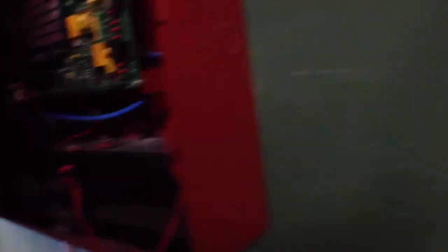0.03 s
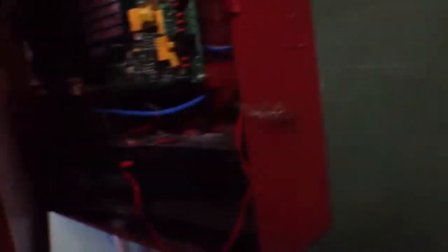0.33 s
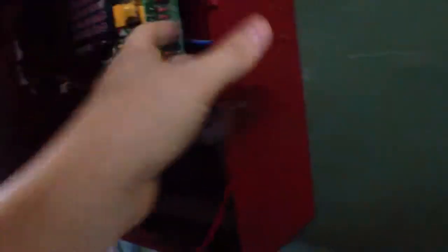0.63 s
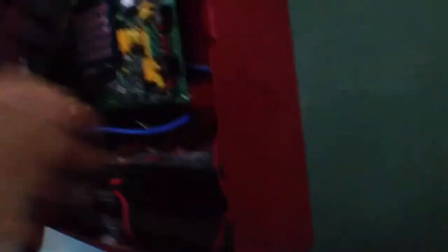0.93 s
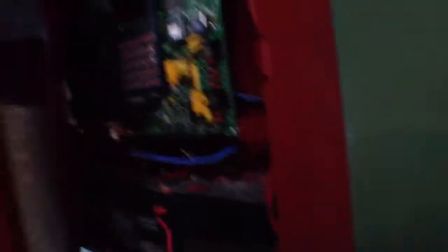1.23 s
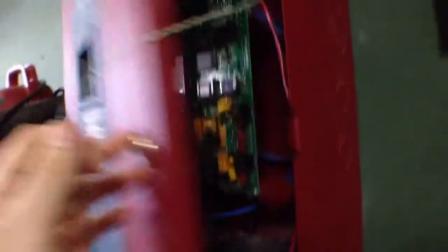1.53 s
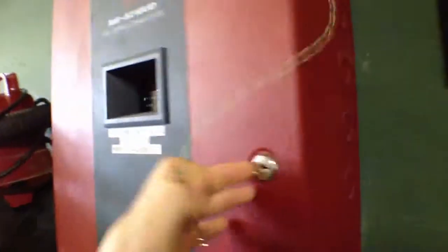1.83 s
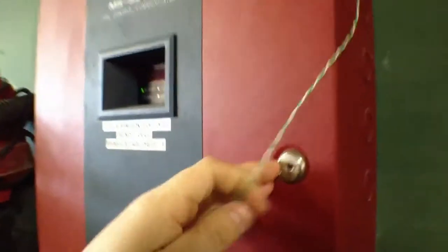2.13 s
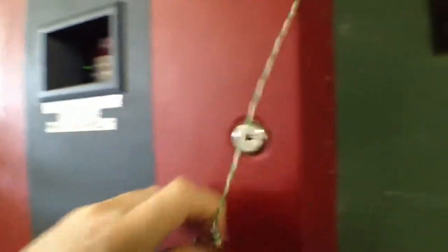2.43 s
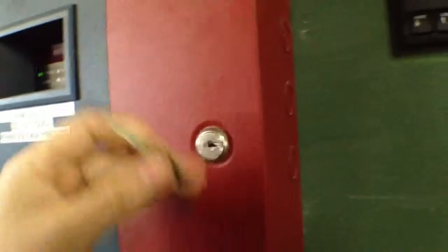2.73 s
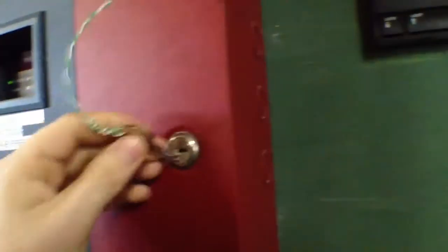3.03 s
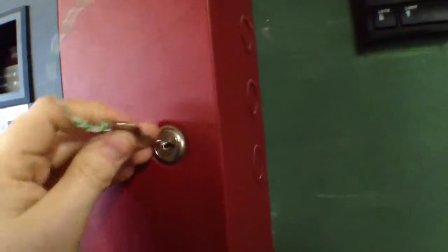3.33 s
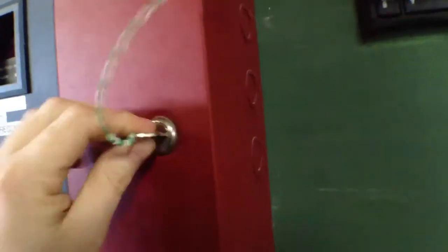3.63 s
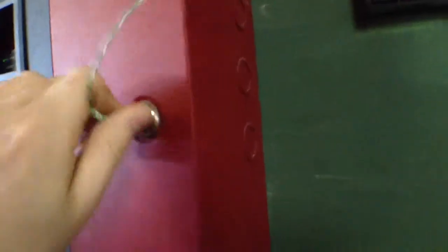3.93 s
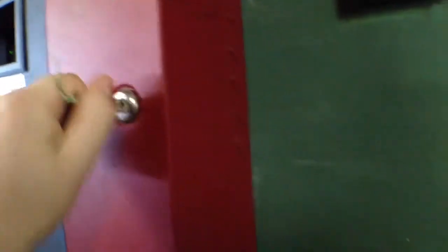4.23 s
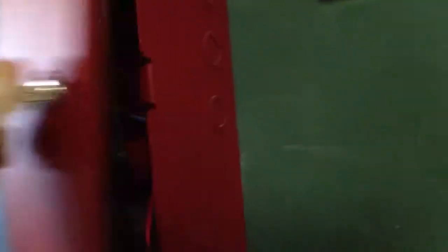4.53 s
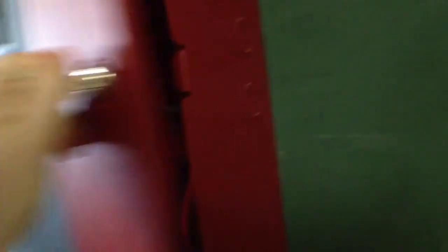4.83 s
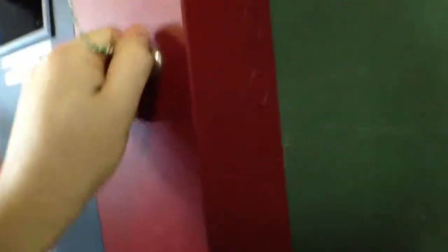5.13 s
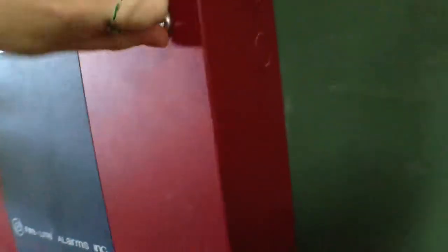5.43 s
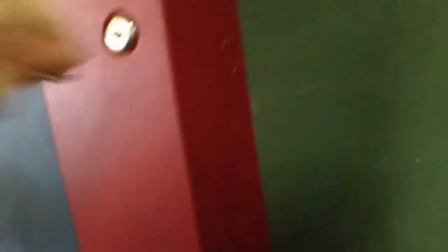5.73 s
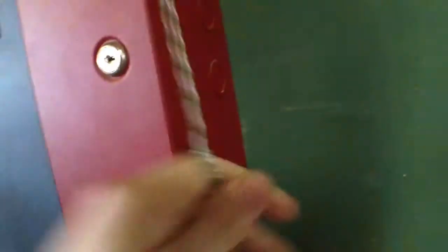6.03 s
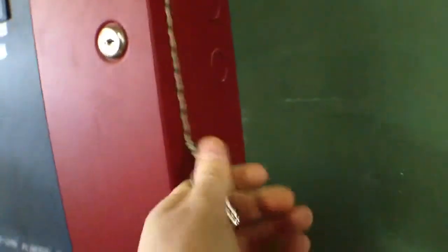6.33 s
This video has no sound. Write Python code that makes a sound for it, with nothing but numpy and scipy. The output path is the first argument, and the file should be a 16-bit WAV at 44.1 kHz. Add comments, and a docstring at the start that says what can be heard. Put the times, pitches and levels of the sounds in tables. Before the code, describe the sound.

A key knocks about, a metal cabinet door swings shut, and the lock clicks and squeaks before the door bangs closed again.

```python
"""A garage with bare walls, up close to a sheet-steel wall cabinet. A key on a cord knocks about in the
open box and the door swings shut. The key slides in and turns with small squeaks, the door is pulled
ajar and banged home, then the key is drawn out and dropped against the door. Hits are bands of dying
noise plus ringing steel modes, squeaks are stick-slip glides, rubs are grainy noise. The walls answer
every contact, over a quiet bed of room tone."""
import sys
import numpy as np
from scipy import signal
from scipy.fft import rfft, irfft, next_fast_len
from scipy.io import wavfile
from scipy.ndimage import uniform_filter1d

SR = 44100
rng = np.random.default_rng(int(sys.argv[2]) if len(sys.argv) > 2 else 0)


def to_wav(sig):
    """Store sig (one row per channel, or 1-D mono) as 16-bit WAV at the path in sys.argv[1].

    Samples outside -1..1 are clipped; the rate is SR.
    """
    pcm = np.clip(np.atleast_2d(sig), -1, 1) * 32767
    pcm = np.round(pcm).astype(np.int16)
    wavfile.write(sys.argv[1], SR, pcm.T)  # frames by channels


N = 281799

# room tone of the still garage: (frequency [Hz], level [dB])
ROOM_TONE = [(15, -65.5), (25, -46.5), (91, -28), (107, -13.5), (193, -6.5), (209, -11.5), (240, -2),
             (281, -9), (359, -6), (389, -8), (598, -10.5), (804, -18), (970, -15.5), (1800, -25),
             (15500, -29)]
# reverb of the bare walls: (frequency [Hz], t60 [s])
WALL_DECAY = [(120, 0.6), (300, 0.51), (800, 0.56), (2000, 0.59), (5000, 0.49), (9000, 0.41), (14000, .4)]
# the four registers of struck steel, in the order boom, body, clank, edge:
# (low [Hz], high [Hz], trim [dB], decay stretch [x], attack lag [s])
REGISTERS = [(128.8, 350, 0, 1.5, 0.0078), (352, 2000, -5.5, 1.99, 0.0036),
             (2070, 6000, -9.5, 1.67, 0.00021), (5700, 15500, -5, 1.02, 0.000038)]

# Hit cues, ahead of each register's trim and stretch; boom, body and edge are relative to the clank:
# (time [s], clank [dB], boom [dB], body [dB], edge [dB], base t60 [s])
BOX_KNOCKS = [(0.2905,-47,-12,2.5,-6.5,0.057), (0.3534,-14.5,-15,-5.5,-4,0.039),
              (0.4495,-36.5,-21,-7,-4.5,0.093), (0.7645,-24.5,-22,-1.5,1.5,0.054),
              (0.7754,-32,-2,-0.5,-2.5,0.019), (1.072,-68,7,5.5,4,0.066), (1.2565,-29,-34,-15,-6.5,0.1),
              (1.443,-53.5,-27,-14,-10,0.1), (1.515,-50,-19,-8.5,-15,0.32)]  # the key in the open box
DOOR_BLOWS = [(1.7145,-45,-28.5,-2,-5.5,0.081), (1.7753,-39.5,-16.5,-7,-7,0.21),
              (1.8245,-36,-7,-5.5,-1.5,0.14), (1.8656,-35.5,-7,2,-15,0.25), (1.8775,-35,-11.5,1,-5,0.19),
              (1.9037,-22,-9.5,-11,-15,0.059), (1.918,-27,-11,-8.5,-10,0.067), (4.457,-57,9,5,5,0.15),
              (4.5003,-39,7,6.5,0,0.048), (4.608,-53,-4,9.5,-15,0.1), (4.691,-59,-8,7,-18,.07),
              (4.8708,-39.5,-15,-9.5,-5.5,0.28), (4.9055,-47,10,10.5,-8.5,0.13),
              (4.9430,-16.5,-17.5,-5.5,-8.5,.12), (4.9552,-25.5,2.5,0.5,-7.5,0.066),
              (4.9743,-31.5,-13.5,2,-3,0.096), (6.2138,-34,-3.5,-1,-23.5,0.13),
              (6.2251,-41,-5,2.5,-9.5,.17)]  # the door meets its frame or is bumped
LOCK_CLICKS = [(2.1045,-48.5,-13,-3,-3.5,0.084), (2.1587,-38.5,-18,-7.5,-5,0.13),
               (2.9428,-47,0,-13.5,-12,.036), (3.0207,-51,-30,-11,-4,.14), (3.0400,-39.5,-11,-8,-7.5,0.051),
               (3.0746,-44,-14,-6,-11,0.064), (3.3900,-55.5,-3.5,4,0,0.028),
               (3.4920,-36.5,-5,-3.5,-9.5,0.12), (3.5080,-45,-10.5,0.5,2,0.13),
               (3.5632,-40,-5.5,-6,-6,0.07), (3.5935,-48.5,1.5,-8.5,2.5,.06),
               (3.6185,-34.5,-7.5,-0.5,-7,0.21), (3.6320,-20,-8.5,-12,2.5,0.073),
               (3.8930,-39.5,-13,-16,-10,0.077), (3.9463,-42.5,-1.5,-5.5,-2.5,0.075),
               (4.0715,-46.5,-8,-26,-1,0.09), (4.1840,-41.5,-21,-36,1.5,0.089),
               (4.2050,-46.5,-9,-26,5.5,0.072), (4.2705,-45.5,-2.5,-6,-2,0.077), (4.4092,-57,2,-5.5,6,.092),
               (4.7285,-62,-6.5,8.5,2,0.078), (4.8105,-55.5,-6.5,4.5,-8.5,.097),
               (5.3115,-36,-9,-19,-3,0.084), (5.6035,-45,0,-2,-7,0.24), (5.6268,-31,-3,-5,-3.5,0.13),
               (5.6445,-38.5,5,-2,-7.5,0.08), (6.3305,-35.5,-12,-12.5,0,0.074)]  # key and lock
# strong modes of the steel panels: (frequency [Hz], level [dB], t60 [s])
BOX_MODES = [(280, 2, .15), (365, 1, .15), (452, -9, .35), (628, 0, .2), (732, -4, .35), (1044, -2, .3),
             (1241, 5, .22), (1394, 3, .16), (1615, 2, .22), (2230, -4, .2), (2560, -2, .18),
             (3020, -5, .3), (4100, -4, .22), (4382, -8, .3), (4705, -8, .3), (5520, -8, .3),
             (6352, -3, .14), (8371, -11, .35)]
DOOR_MODES = [(142, -5, .2), (172, -3, .2), (188, 3, .27), (212, -7, .2), (275, -6, .2), (322, -2, .22),
              (487, 6, .36), (555, -4, .25), (644, 0, .25), (1009, -3, .28), (1500, -3, .18),
              (1590, -1, .35), (1820, -9, .35), (2080, -5, .22), (2480, -2, .33), (3060, -2, .3),
              (3206, 0, .29), (3296, -2, .28), (3465, -2, .35), (3855, -2, .4), (5131, -2, .3),
              (6080, -7, .25), (8125, -7, .3), (9984, -7, .3), (10670, -8, .3)]
# EQ of the crowd of short modes that a hit stirs in each part: (frequency [Hz], level [dB])
BOX_EQ = [(100, -16), (240, -9.5), (290, 1), (800, -5), (1300, -3), (1900, 0), (3000, 0.5), (6300, -3),
          (10000, -8.5), (13000, -15), (15000, -28)]
DOOR_EQ = [(100, -19), (165, 4.5), (255, 1), (400, 1.5), (800, 0), (1500, 0), (3000, -7.5), (6000, -9.5),
           (10000, -11), (12500, -15), (15000, -28.5)]
LOCK_EQ = [(100, -27.5), (150, -6.5), (186, 18), (250, -3.5), (450, 0.5), (800, 10.5), (3000, -3),
           (6000, -4.5), (8500, -6), (11000, -6.5), (13000, -9.5), (15000, -19)]

# flurries from loose parts and lock pins: (start [s], end [s], level [dB], rate [ticks/s])
RATTLE_CUES = [(0.371, 0.471, -36.5, 170), (1.851, 1.965, -36, 90), (2.486, 2.627, -55.5, 35),
               (3.498, 3.61, -47.5, 70), (3.894, 3.989, -57, 50), (6.205, 6.3, -46.5, 60)]
# EQ of their ticks: (frequency [Hz], level [dB])
RATTLE_EQ = [(200, -31.0), (600, -2.5), (1500, 0), (3500, 0.5), (7000, -5.5), (12000, -5.5),
             (15000, -14.5)]
# the key's own ring, and high clicks of the lock's pins from 4.07 s on: (time [s], level [dB], pitch [Hz], t60
# [s])
PINGS = [(1.2590, -41.5, 2250, 0.0566), (1.255, -46.5, 2920, 0.095), (1.2570, -42, 4900, 0.084),
         (3.6340, -33.5, 10370, 0.13), (4.071, -47, 11740, 0.045), (4.185, -38.5, 11900, 0.052),
         (4.4089, -42, 11460, 0.055)]
# strokes of hand, cord and key on the door; rumble and hiss are relative to the scrape:
# (time [s], length [s], scrape at mid-stroke [dB], swell [dB], rumble [dB], hiss [dB])
RUB_CUES = [(2.236, 0.12, -50, 11, -10, -15.5), (2.386, 0.23, -74.5, -8, 15, -7.5),
            (2.907, 0.16, -75.5, 9, 15, -8), (3.076, .04, -61, -2, 0, -17),
            (3.326, .16, -67.5, -3, 7.5, -20), (3.48, 0.095, -56.5, -4, 5.5, -10.5),
            (3.833, 0.082, -63, 6, 6.5, -8.5), (3.941, 0.049, -59, -6, 3.5, 0),
            (4.064, .05, -59.5, 3.5, -3, 1.5), (4.184, .12, -58.5, 7, -4, -1),
            (4.446, 0.065, -54, 13.5, 5, -2.5), (4.521, .11, -60.5, -2.5, 6, -24.5),
            (4.681, .06, -62.5, -7, 4.5, -27), (5.224, .12, -57.5, 5.5, -4.5, -0.5),
            (5.358, .06, -61, -5, 1, -5.5), (5.691, 0.051, -68, -7, 17, -10)]
# EQ of the three layers of a rub: (frequency [Hz], level [dB])
RUMBLE_EQ = [(50, -54), (100, -40.5), (140, -8), (168, -7), (186, 4), (205, -9), (250, -9.5), (340, -4.5),
             (410, -10), (490, -5.5), (700, -17), (1500, -46.5)]
SCRAPE_EQ = [(240, -37), (400, -3), (534, -7.5), (660, -8), (999, -4.5), (2230, -2.5), (2720, -1.5),
             (3200, -6.5), (8000, -16), (10400, -46), (17600, -120)]
HISS_EQ = [(3000, -37), (6000, -5), (10000, -1.5), (15000, -13)]
# dry metal squeaks in the lock: (time [s], level [dB], start pitch [Hz], end pitch [Hz], length [s])
LOCK_SQUEAKS = [(3.945, -50, 8200, 7980, 0.014), (4.02, -66.5, 2650, 2800, 0.046),
                (4.065, -55.5, 2950, 4280, 0.017), (4.073, -59, 2460, 2290, 0.045),
                (4.081, -45.5, 8630, 8030, 0.038), (4.174, -52, 3460, 2810, 0.028),
                (4.262, -57.5, 1720, 1490, .045), (4.263, -34.5, 8490, 7860, .018),
                (4.276, -38.5, 8300, 8000, 0.025), (5.253, -49.5, 11900, 10900, 0.0186),
                (5.338, -48.5, 4400, 5260, 0.022), (5.608, -45.5, 6270, 5820, 0.0092)]

SOFT_RISE_S, HARD_DB = 0.0019, -21  # attack of a light touch, and the hit level that halves it
TOP_HZ = 15600


def amp(db):
    """Decibels to gain."""
    return 10 ** (np.asarray(db) / 20)


def unit(x):
    """Scaled to rms 1."""
    return x / np.sqrt(np.mean(x ** 2) + 1e-20)


def along(points, hz):
    """A curve of (frequency, value) points, read on a log frequency axis."""
    freqs, values = np.transpose(points)
    return np.interp(np.log(hz + 1), np.log(freqs + 1), values)


def filtered(x, response):
    """x through a filter whose gain is response(hz)."""
    size = next_fast_len(len(x) + 8192)
    return irfft(rfft(x, size) * response(np.fft.rfftfreq(size, 1 / SR)), size)[:len(x)]


def coloured(x, eq):
    """x through an EQ curve, at rms 1."""
    return unit(filtered(x, lambda hz: amp(along(eq, hz))))


def band(hz, lo, hi, order=8):
    """Gain of a band-pass with steep skirts."""
    return ((1 + (lo / (hz + 1)) ** (2 * order)) * (1 + (hz / hi) ** (2 * order))) ** -.5


def wobble(t, step):
    """A random modulator that glides to a new value every step samples."""
    return np.interp(t, t[::step], rng.standard_normal(len(t[::step])))


def add(track, time, x):
    """Mix x into the track at a time in seconds."""
    start = round(time * SR)
    track[start:start + len(x)] += x[:N - start]


def room_tone(level_db=-69):
    """The still air of the garage: a faint, dark bed of noise."""
    return amp(level_db) * coloured(rng.standard_normal(N), ROOM_TONE)


def wall_reverb(x, wet_db, build_s=0.0027):
    """A sound plus its diffuse answer from the walls, a noise tail that dies soonest in the highs."""
    hz, t, spectra = signal.stft(rng.standard_normal(SR), SR, nperseg=256)
    fade = amp(-60 * t / along(WALL_DECAY, hz)[:, None]) * (1 - np.exp(-t / build_s))
    tail = signal.istft(spectra * fade, SR, nperseg=256)[1]
    return x + amp(wet_db) * signal.fftconvolve(x, tail / np.linalg.norm(tail))[:len(x)]


def resonances(modes, hz, half_width_hz=18):
    """The steel passes more sound around each of its modes above 400 Hz."""
    return 1 + sum(amp(db + 3) / (1 + ((hz - centre) / half_width_hz) ** 2)
                   for centre, db, _ in modes if centre > 400)


def sheet_ring(modes, t, blur=0.0066):
    """Modes of a loose sheet: each wavers in pitch, so none rings pure."""
    out = np.zeros(len(t))
    for hz, db, t60 in modes:
        waver_hz = blur * np.sqrt(hz * 1000) * wobble(t, 256)
        fade = amp(db + rng.normal(0, 1.8) - 60 * t / t60)
        out += fade * np.sin(2 * np.pi * (np.cumsum(hz + waver_hz) / SR + rng.random()))
    return out


def steel_hits(cues, eq, modes, ring_db, wet_db, hold_s, push_db):
    """Metal on metal: a brief chatter stirs a crowd of short modes, and a few strong ones ring on."""
    out, t = np.zeros(N), np.arange(SR // 2) / SR
    bins_hz = np.fft.rfftfreq(next_fast_len(len(t) + 8192), 1 / SR)  # the bins of filtered()
    steel = amp(along(eq, bins_hz)) * resonances(modes, bins_hz)
    shove = t / 0.0028
    air_push = shove * (2 - shove) * np.exp(-shove)  # the panel shoves a little air
    for time, db, boom_db, body_db, edge_db, t60 in cues:
        hit = np.zeros(len(t))
        rise = SOFT_RISE_S / (1 + amp(db - HARD_DB))
        for (lo, hi, trim_db, stretch, lag), share_db in zip(REGISTERS, (boom_db, body_db, 0, edge_db)):
            fade = amp(-60 * np.maximum(t - hold_s, 0) / (t60 * stretch))
            crowd = fade * filtered(rng.standard_normal(len(t)), lambda hz: band(hz, lo, hi) * steel)
            crowd *= np.linalg.norm(fade) / np.linalg.norm(crowd)
            ring = sheet_ring([mode for mode in modes if lo <= mode[0] < hi], t)
            # slow bending waves reach their full swing later than the treble
            attack = 1 - np.exp(-t / (rise + lag + 1e-5))
            hit += amp(db + share_db + trim_db) * (crowd + amp(ring_db) * ring) * attack
        hit += amp(db + push_db) * air_push
        add(out, time, wall_reverb(np.pad(hit, (0, len(t))), wet_db))
    return out


def box_knocks():
    """The key swings on its cord and clanks against the open box."""
    return steel_hits(BOX_KNOCKS, BOX_EQ, BOX_MODES,
                      ring_db=-16, wet_db=-12.5, hold_s=0.003, push_db=-42)


def rattles(tick_t60=0.009, scatter_db=4):
    """Loose parts rattle and pins ride over the key: random ticks coloured by the door's modes."""
    ticks, t = np.zeros(N), np.arange(SR // 20) / SR
    for start, end, db, rate in RATTLE_CUES:
        for place, size in rng.random((int((end - start) * rate) + 1, 2)):
            fade = amp(db + scatter_db * (2 * size - 1) - 60 * t / tick_t60)
            add(ticks, start + place * (end - start), fade * rng.standard_normal(len(t)))
    rattle = filtered(ticks, lambda hz: amp(along(RATTLE_EQ, hz)) * resonances(DOOR_MODES, hz))
    return wall_reverb(rattle, wet_db=-6.5)


def pings(spread=0.019, mode_count=7):
    """Each ping is a tight cluster of modes that beat as they die."""
    out, t = np.zeros(N), np.arange(SR) / SR
    for time, db, hz, t60 in PINGS:
        # the shorter the ring, the wider the cluster
        pitches = hz * (1 + spread * (0.089 / t60) ** 2 * rng.standard_normal((mode_count, 1)))
        cluster = np.sin(2 * np.pi * (pitches * t + rng.random((mode_count, 1)))).sum(0)
        fade = amp(-60 * t / t60) * (1 - np.exp(-t / 0.0006))
        ping = unit(cluster * fade) * np.sqrt(np.mean(fade ** 2))
        add(out, time, amp(db) * wall_reverb(ping, wet_db=-8))
    return out


def door_blows():
    """The door hits its frame or takes a bump, and the whole sheet booms."""
    return steel_hits(DOOR_BLOWS, DOOR_EQ, DOOR_MODES,
                      ring_db=-18.5, wet_db=-11.5, hold_s=0.0044, push_db=-42)


def lock_clicks():
    """Key and lock click through the door panel, with barely any ring."""
    return steel_hits(LOCK_CLICKS, LOCK_EQ, DOOR_MODES,
                      ring_db=-31.5, wet_db=-11, hold_s=0.0037, push_db=-45)


def stroke(length, swell_db, attack_s=0.008, release_t60=0.1):
    """Envelope of a rub: contact builds quickly, pressure grows or eases, then the hand lets go."""
    t = np.arange(SR) / SR
    pressure_db = swell_db * (np.minimum(t / length, 1) - .5)
    release_db = -60 * np.maximum(t - length, 0) / release_t60
    return amp(pressure_db + release_db) * (1 - np.exp(-t / attack_s))


def door_rubs(rumble_db=-3, scrape_db=-3, hiss_db=-6):
    """Fingers flex the panel as cord and key slide over it; each stroke drives rumble, scrape, hiss."""
    envelopes = np.zeros((3, N))
    for time, length, db, swell_db, rumble_rel_db, hiss_rel_db in RUB_CUES:
        for envelope, share_db in zip(envelopes, (rumble_rel_db, 0, hiss_rel_db)):
            add(envelope, time, amp(db + share_db) * stroke(length, swell_db))
    grain = amp(1.5 * unit(uniform_filter1d(rng.standard_normal(N), size=150)))  # 1.5 dB rms flicker
    rumble, scrape, hiss = [coloured(grain * rng.standard_normal(N), eq)
                            for eq in (RUMBLE_EQ, SCRAPE_EQ, HISS_EQ)]
    scrape = unit(filtered(scrape, lambda hz: resonances(DOOR_MODES, hz)))
    layers = np.array([amp(rumble_db) * rumble, amp(scrape_db) * scrape, amp(hiss_db) * hiss])
    return wall_reverb((envelopes * layers).sum(0), wet_db=-5)


def lock_squeaks(ring_t60=0.13, ring_db=-1, jitter_hz=150):
    """The lock sticks and slips in brief, shaky glides that beat against their own ring in the door."""
    out, t = np.zeros(N), np.arange(SR) / SR
    for time, db, start_hz, end_hz, length in LOCK_SQUEAKS:
        progress = np.clip(t / length, 0, 1)
        pitch = start_hz + (end_hz - start_hz) * progress + jitter_hz * wobble(t, 64)
        glide = np.sin(np.pi * progress) * np.sin(2 * np.pi * np.cumsum(pitch) / SR)
        door_tail = rng.standard_normal(SR) * amp(-60 * t / ring_t60)
        ring = signal.fftconvolve(glide, door_tail / np.linalg.norm(door_tail))[:SR]
        add(out, time, amp(db) * wall_reverb(glide + amp(ring_db) * ring, wet_db=-13))
    return out


def scene():
    """The mono mix: steel hits and small details over the room tone."""
    hits = box_knocks() + door_blows() + lock_clicks()
    bed = room_tone()
    details = pings() + lock_squeaks() + rattles() + door_rubs()
    return (hits + details + bed)[None]


def record(dry):
    """A brick-wall low-pass on the mix at TOP_HZ."""
    return filtered(dry[0], lambda hz: hz < TOP_HZ)[None]


dry = scene()
out = record(dry)
to_wav(out)
```